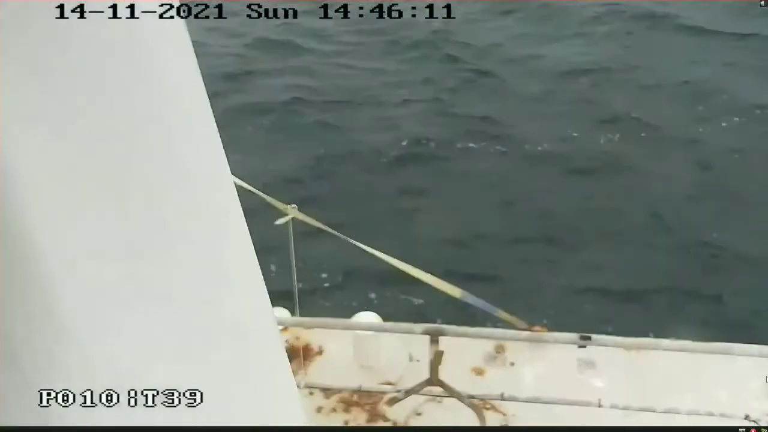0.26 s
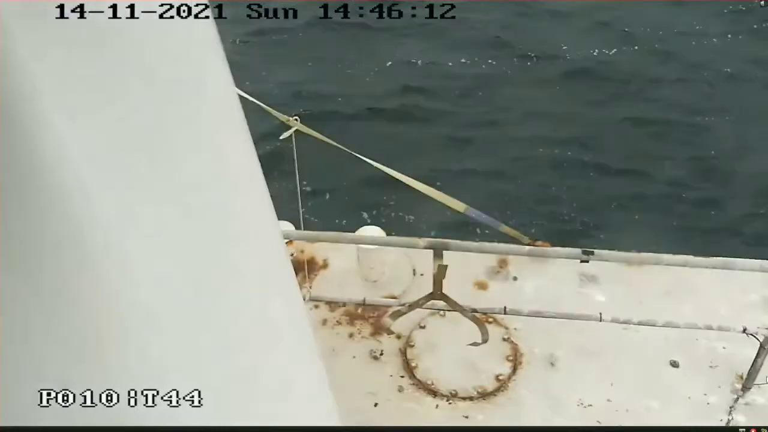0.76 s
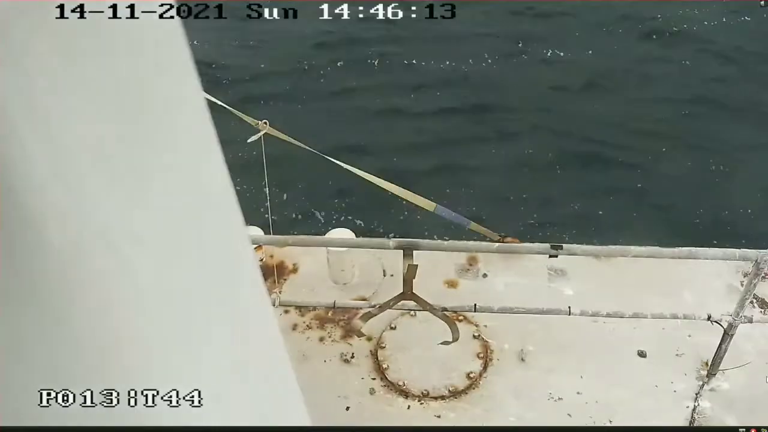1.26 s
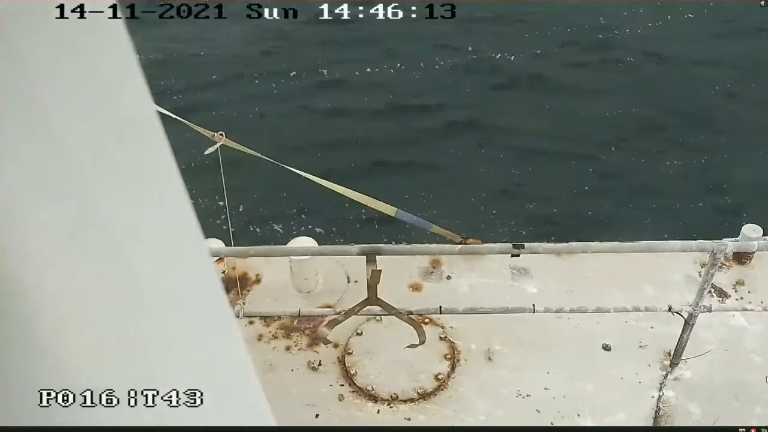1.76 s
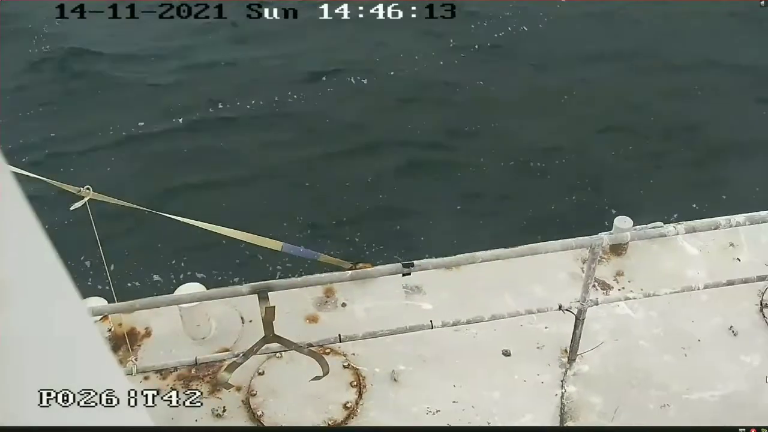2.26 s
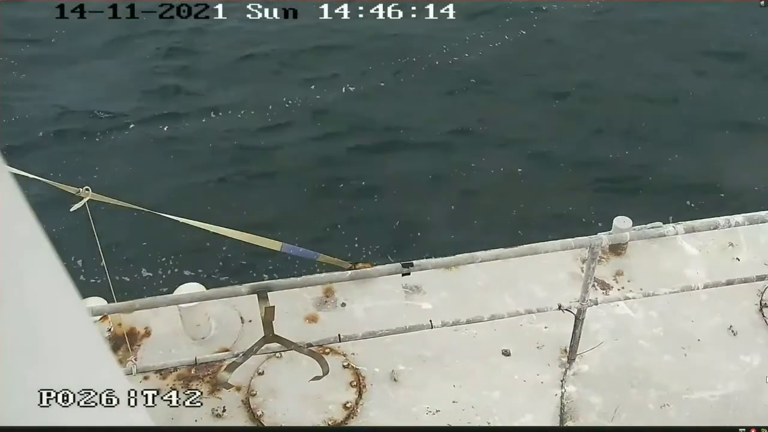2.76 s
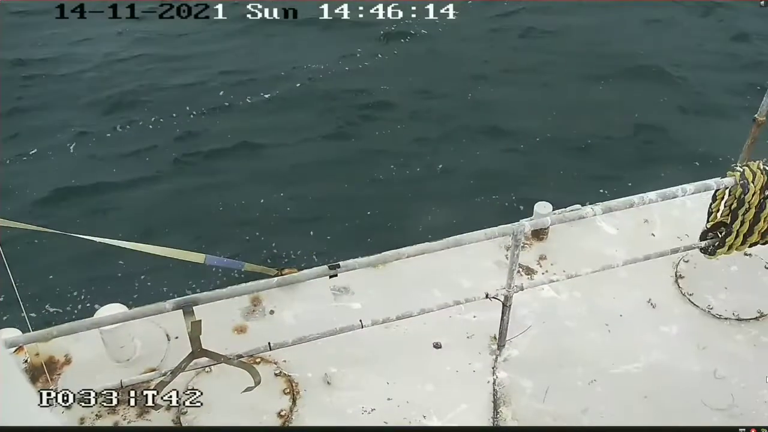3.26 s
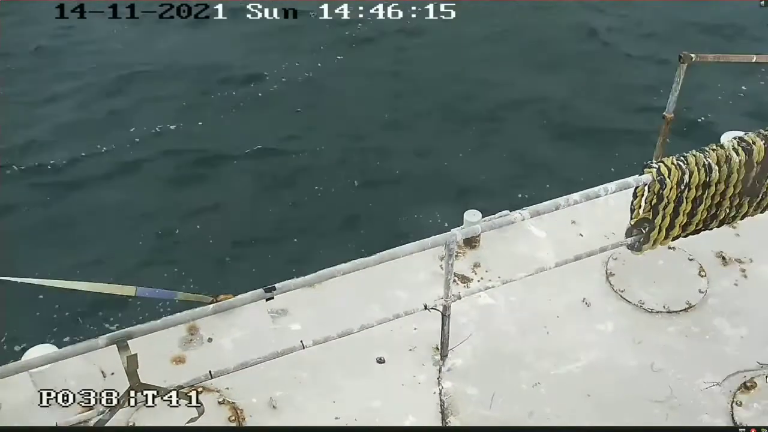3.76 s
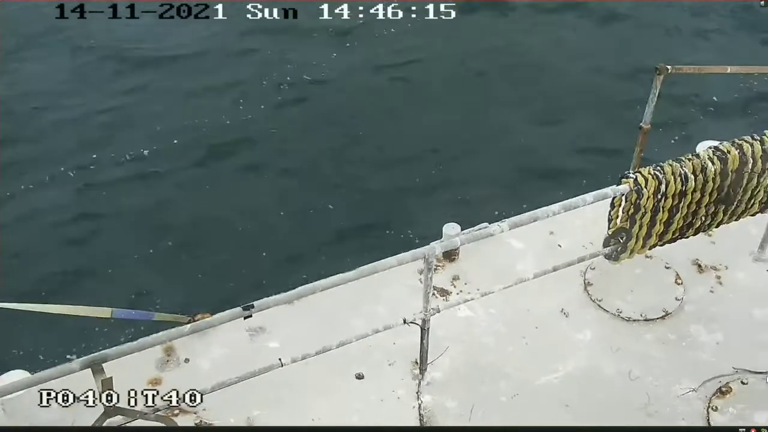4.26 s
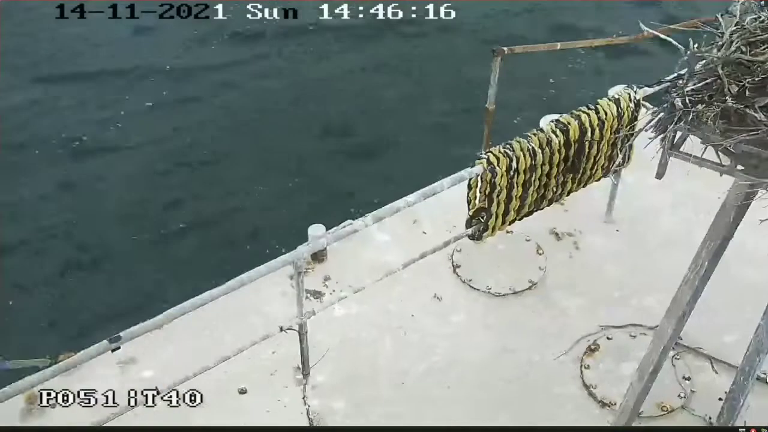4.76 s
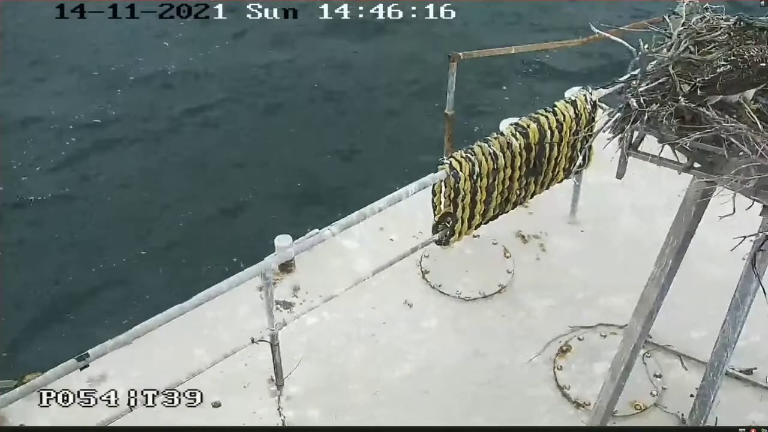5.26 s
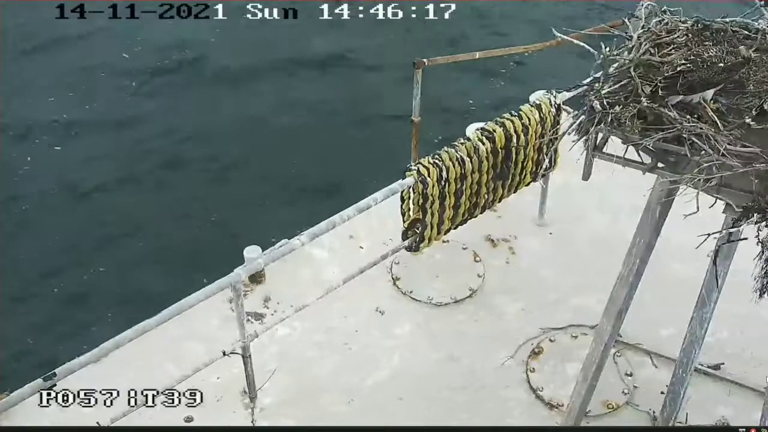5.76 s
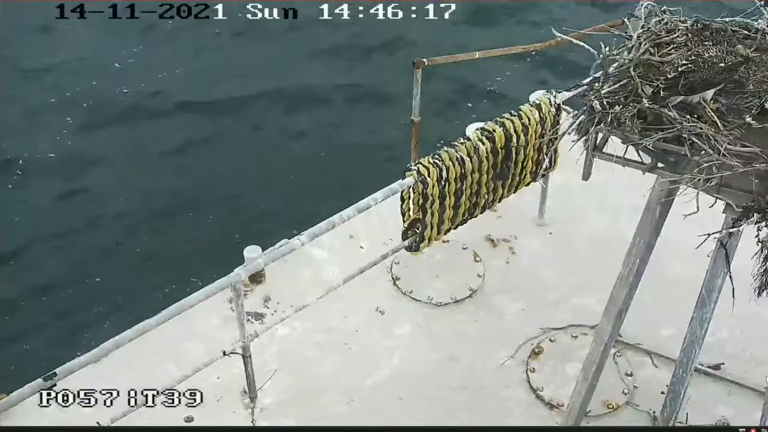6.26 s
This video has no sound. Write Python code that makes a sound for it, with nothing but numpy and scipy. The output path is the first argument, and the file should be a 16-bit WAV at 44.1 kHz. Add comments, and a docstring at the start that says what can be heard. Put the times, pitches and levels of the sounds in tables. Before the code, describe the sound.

An unseen bird of prey on a nest platform at sea utters seven shrill, raspy whistles, the first already under way. Each flicks up, wavers between hoarse rasp and clear tone, then flicks down. Wind thumps the outdoor camera microphone early, eases, then returns thickly near the end with small clicks. A faint water wash lies beneath; the lo-fi sound has metallic treble and tiny dropouts.

```python
"""An osprey on its nest on a platform at sea whistles seven calls over wind and a faint wash, near a
surveillance camera. The first call is under way at the start; the others run from yip to yip, chaotic rasp
giving way to clear sine notes, with a thin whistle above. Noise-and-pulse wind buffets the microphone from
0.5 s, hardest near 1.9 s, and thickly again from 5.1 s, when clicks join it. Throughout, the camera's 8 kHz
sampling mirrors the calls into the treble; its sound cuts out for instants early and late."""
import sys
import numpy as np
from scipy import signal
from scipy.fft import rfft, irfft
from scipy.io import wavfile
from scipy.ndimage import uniform_filter1d

SR = 44100
rng = np.random.default_rng(int(sys.argv[2]) if len(sys.argv) > 2 else 0)


def transcribe(signal):
    """Save signal, clipped to [-1, 1], as a 16-bit WAV file at the path in sys.argv[1]."""
    frames = np.atleast_2d(signal).T
    limited = np.clip(frames, -1, 1)
    pcm = np.round(limited * 32767).astype(np.int16)
    wavfile.write(sys.argv[1], SR, pcm)


N = 287091
TIME = np.arange(N) / SR


def amp(db):
    """Decibel law: the amplitude ratio of a level."""
    return 10 ** (np.asarray(db) / 20)


def unit(x):
    """Normalisation: scales a signal to rms 1."""
    return x / np.sqrt(np.mean(x ** 2) + 1e-20)


def add(mix, s, sound):
    """Superposition: adds a sound to the mix at time s, or at the start if s is negative."""
    part = mix[max(round(s * SR), 0):][:len(sound)]
    part += sound[:len(part)]


def level_at(times, rows):
    """Interpolation: reads a (time [s], level [dB]) table at the given times."""
    return np.interp(times, *np.transpose(rows))


def colour(x, points):
    """Spectral shaping: filters by (frequency [Hz], gain [dB]) points joined on a log-frequency axis."""
    hz, db = np.transpose(points)
    bins = np.fft.rfftfreq(len(x), 1 / SR)
    gain_db = np.interp(np.log(bins + 1), np.log(hz + 1), db)
    return irfft(rfft(x) * amp(gain_db), len(x))


def noise(points):
    """Coloured noise: white noise shaped to a spectrum, at rms 1."""
    return unit(colour(rng.standard_normal(N), points))


def wander(rate_hz, size):
    """Low-passed randomness: smooth motion up to about rate_hz, from a one-second loop of rms 1."""
    bins = np.fft.rfftfreq(SR, 1 / SR)
    spectrum = rfft(rng.standard_normal(SR)) / (1 + ((bins / rate_hz) ** 2) ** 2)
    return np.resize(unit(irfft(spectrum, SR)), size)


def low_lumps(rate_hz):
    """Band-limited fluctuation: random swings of rms 1 over the whole scene, mostly below rate_hz."""
    return noise([(rate_hz, 0), (2 * rate_hz, -60)])


def low_pass(x, edge_hz):
    """Band limiting: a steep linear-phase low-pass."""
    return signal.oaconvolve(x, signal.firwin(1023, edge_hz, window=("kaiser", 9), fs=SR), "same")


def follow(rows):
    """Interpolation: the start time and one curve per further column of a table."""
    s, *columns = np.transpose(rows)
    t = np.arange(s[0], s[-1], 1 / SR)
    return s[0], [np.interp(t, s, c) for c in columns]


def faded(x, fade_s=.003):
    """Click avoidance: linear ramps at both ends."""
    i = np.arange(len(x))
    return x * np.minimum(np.minimum(i, i[::-1]) / (fade_s * SR), 1)


def quadrature_noise(rate_hz, phase):
    """Random modulation: two wandering carriers in quadrature widen a line into a band."""
    n = len(phase)
    return wander(rate_hz, n) * np.cos(phase) + wander(rate_hz, n) * np.sin(phase)


def whistle(hz, db, rough, rasp_hz=130, skirt_hz=430, skirt_db=-5.5, skirt_ratio=.94,
            jitter=.011, throb_hz=45, throb_db=1.8):
    """Nonlinear voicing: a near sine whose swing turns chaotic as roughness (0 to 1) rises."""
    n, rough = len(hz), np.clip(rough, 0, 1)
    phase = 2 * np.pi * np.cumsum(hz * (1 + jitter * rough * wander(150, n))) / SR
    core = quadrature_noise(rasp_hz, phase)
    skirt = quadrature_noise(skirt_hz, skirt_ratio * phase)
    # the rasp comes in uneven spurts
    rasp = unit((core + amp(skirt_db) * skirt) * amp(throb_db * wander(throb_hz, n)))
    clear = np.sqrt(2 * (1 - rough ** 2)) * np.sin(phase)
    return faded(amp(db) * (clear + rough * rasp))


def side_tone(hz, db, jitter, shimmer):
    """Frequency and amplitude modulation: a thin sine that trembles in pitch and strength."""
    n = len(hz)
    phase = 2 * np.pi * np.cumsum(hz * (1 + jitter * wander(230, n))) / SR
    return faded(amp(db) * np.sqrt(2) * np.sin(phase) * (1 + shimmer * wander(110, n)))


# the hoarse body of each call: (start [s], end [s], starting pitch [Hz], climb over the call [Hz],
# starting level before yielding to clear notes [dB], swell to the end [dB], arch in the middle [dB],
# roughness [0-1, excess is limited])
CALL_BODIES = [(0, 0.376, 3170, -59, -54.5, -13, -3.5, 1.1), (0.779, 1.369, 3210, -1.5, -53, 4, -3, 0.92),
               (1.725, 2.145, 3364, -100, -62, -4.5, 5, 1.13), (2.693, 3.339, 3113, 129, -63, -6, 3.5, 1.2),
               (3.598, 4.006, 2643, 110.5, -61.5, -0.5, 7, 0.71),
               (4.444, 4.955, 2676, 283, -52, -7, -1, 0.74), (5.516, 6.092, 2783, 132, -51.5, -6, 0, 0.76)]


def rasps():
    """Chaotic oscillation: each hoarse body drifts steadily in pitch while its level slopes and arches."""
    out = np.zeros(N)
    for start, end, hz, climb_hz, db, swell_db, arch_db, rough in CALL_BODIES:
        u = np.linspace(0, 1, round((end - start) * SR))
        level_db = db + swell_db * u + arch_db * np.sin(np.pi * u)
        add(out, start, whistle(hz + climb_hz * u, level_db, rough))
    return out


# stretches where the voice runs clear, one curve a note: (time [s], pitch [Hz], level [dB])
CLEAR_NOTES = [
    [(0.0, 3093, -48), (0.018, 3200, -36.5), (0.036, 3296, -47.5), (0.045, 3330, -51)],
    [(0.83, 3330, -54), (0.84, 3250, -36), (0.852, 3192, -33), (0.9, 3356, -42), (0.915, 3374, -51)],
    [(3.078, 3190, -52), (3.092, 3118, -46), (3.148, 3124, -65), (3.162, 3140, -44), (3.19, 3087, -55),
     (3.21, 3305, -42.5), (3.225, 3310, -60)],
    [(1.762, 3220, -47), (1.774, 3156, -41), (1.842, 3200, -33.5), (1.868, 3277, -39), (1.878, 3407, -46),
     (1.9, 3445, -39.5), (1.918, 3500, -46.5), (1.925, 3455, -50)],
    [(2.715, 3160, -47), (2.723, 2936, -48.5), (2.741, 2887, -55), (2.793, 2949, -47), (2.843, 2946, -48.5),
     (2.891, 3023, -42.5), (2.957, 3032, -39), (2.989, 3055, -46.5), (2.997, 3013, -55),
     (3.013, 3090, -45.5), (3.033, 3218, -54.5), (3.048, 3246, -44.5)],
    [(3.545, 2660, -45), (3.553, 2586, -51.5), (3.605, 2644, -48.5), (3.62, 2770, -48)],
    [(5.535, 2730, -52), (5.555, 2770, -42.5), (5.575, 2810, -46), (5.587, 2760, -52)],
    [(5.61, 2790, -68), (5.64, 2940, -42.5), (5.662, 2980, -51)],
]


def clear_notes():
    """Periodic oscillation: the voice locks into an almost pure, gliding tone."""
    out = np.zeros(N)
    for rows in CLEAR_NOTES:
        start, (hz, db) = follow(rows)
        add(out, start, whistle(hz, db, rough=.1))
    return out


# the thin upper whistle, one curve an entry:
# (time [s], pitch [Hz], level before yielding to clear notes [dB])
UPPER_WHISTLE = [
    [(.065, 4170, -66), (.15, 4300, -78), (.36, 4420, -92)],
    [(.77, 4160, -56.5), (.82, 4120, -64), (.9, 4200, -64), (.94, 4220, -55), (1.0, 4206, -59),
     (1.07, 4253, -66.5), (1.325, 4360, -64), (1.36, 4180, -63)],
    [(1.716, 4310, -68), (1.752, 4040, -58)],
    [(1.925, 4250, -78), (2.03, 4380, -67.5), (2.15, 4400, -77)],
    [(2.685, 4160, -71.5), (2.735, 4340, -42.5)],
    [(3.22, 4280, -66), (3.345, 4330, -91)],
    [(3.505, 3345, -62), (3.53, 3270, -59.5), (3.59, 3330, -81), (3.62, 3357, -53.5), (3.67, 3376, -52),
     (3.695, 3450, -71), (3.725, 3516, -54), (3.78, 3610, -64.5), (3.86, 3754, -58), (3.97, 3880, -68),
     (4.005, 3730, -62.5)],
    [(4.445, 3610, -54.5), (4.505, 3573, -60), (4.59, 3780, -61), (4.71, 3980, -70.5), (4.76, 4095, -70),
     (4.795, 4180, -86), (4.825, 4130, -68), (4.915, 4195, -68), (4.94, 4120, -62)],
    [(5.505, 3700, -77), (5.55, 3830, -55)],
    [(5.69, 3960, -74), (5.82, 4070, -69.5), (5.92, 4075, -71), (6, 4124, -60.5), (6.06, 4150, -64.5),
     (6.09, 4070, -56)],
]


def upper_whistles():
    """Biphonation: a thin second voice eases in above the rasp."""
    out = np.zeros(N)
    for rows in UPPER_WHISTLE:
        start, (hz, db) = follow(rows)
        add(out, start, faded(side_tone(hz, db, jitter=.0032, shimmer=.25), fade_s=.015))
    return out


def swoop(s, hz, db, glide_hz_per_s, hold_s, fall_db_per_s):
    """Linear chirp: start time, pitch and level of a quick glide that swells and dies around its peak."""
    t = np.arange(-SR // 30, SR // 30) / SR
    return s + t[0], hz + glide_hz_per_s * t, db - fall_db_per_s * (np.hypot(t, hold_s) - hold_s)


# flicks at the ends of the calls:
# (peak time [s], pitch [Hz], level [dB], glide [Hz/s], hold [s])
YIPS = [(0.387, 2974, -46.5, -14000, 0.0014), (.77, 3023, -42, 7010, 0.0016),
        (1.356, 3035, -41.5, -15000, 0.0022), (1.735, 3140, -52, 3006.5, 0.0011),
        (2.176, 3177, -38, -13000, 0.0017), (2.681, 2970, -51, 10003.5, 0.014),
        (3.369, 3004, -46, -13000, 0.002), (3.498, 2370, -57.5, 8006, 0.0014),
        (3.997, 2590, -45.5, -10000, 0.0018), (4.443, 2675, -47, 6997, .004),
        (4.958, 2720, -45.5, -8000, 0.0018), (5.501, 2743, -42, 7006, 0.0075),
        (6.107, 2736, -43, -7000, 0.0046)]


def yips(fall_db_per_s=1400):
    """Chirped onset and release: calls open with an upward flick and close with a downward one."""
    out = np.zeros(N)
    for row in YIPS:
        start, hz, db = swoop(*row, fall_db_per_s)
        add(out, start, whistle(hz, db, rough=.38))
    return out


# brief low notes where the voice cracks:
# (peak time [s], pitch [Hz], level [dB], glide [Hz/s], hold [s])
CRACKS = [(.393, 2290, -61, -16000, 0.0048), (0.759, 2310, -47, 14005, 0.0038),
          (1.365, 2260, -53, -16000, 0.0025), (2.183, 2260, -60, -16000, .004),
          (2.86, 2384, -60, 1485, 0.062), (3.383, 2270, -57, -13000, 0.0028)]


def cracks(fall_db_per_s=2100):
    """Register break: the voice cracks briefly into a lower gliding note."""
    out = np.zeros(N)
    for row in CRACKS:
        start, hz, db = swoop(*row, fall_db_per_s)
        add(out, start, side_tone(hz, db, jitter=.012, shimmer=.3))
    return out


def osprey(rasp_yield_db=-6, upper_yield_db=-18):
    """Mode competition: rasp and upper whistle give way whenever the voice runs clear."""
    spans = sum((TIME > rows[0][0]) & (TIME < rows[-1][0]) for rows in CLEAR_NOTES)
    clear = uniform_filter1d(1. * spans, size=400)
    voice = clear_notes() + yips() + cracks()
    hoarse = rasps() * amp(rasp_yield_db * clear)
    upper = upper_whistles() * amp(upper_yield_db * clear)
    return voice + hoarse + upper


def deck(x, echo_db=-22, t60_s=.17):
    """Diffuse reverberation: faint, exponentially dying scatter from the deck and rails."""
    t = np.arange(SR // 2) / SR
    tail = rng.standard_normal(len(t)) * amp(-60 * t / t60_s) * (t > .004)
    return x + amp(echo_db) * signal.oaconvolve(x, tail / np.linalg.norm(tail))[:N]


def two_sided_decay(t, rise_s, fall_s):
    """Exponential envelope: grows up to t = 0 and decays after it."""
    return np.exp(-abs(t) / np.where(t < 0, rise_s, fall_s))


# the wind between buffets: (time [s], level before the wind or eddy offset [dB])
WIND = [(0, -74.5), (.72, -69.5), (.84, -53.5), (1.25, -74.5), (1.41, -72), (1.52, -60.5), (1.68, -68.5),
        (1.91, -53), (2.15, -71), (3.0, -79), (3.9, -77), (4.3, -86), (4.5, -68), (5.07, -70.5),
        (5.22, -55), (5.9, -56), (6.27, -64), (6.45, -55.5)]
# spectrum of the wind: (frequency [Hz], relative density [dB])
WIND_COLOUR = [(20, -36), (60, -17.5), (130, -3), (260, -2.5), (400, -7), (600, -10.5), (900, -19.5),
               (1500, -23.5), (3500, -45.5)]


def wind(lumps_db=5, wind_db=-2.5, wake_db=-21):
    """Turbulent noise: a lumpy low rumble swells with each gust and lingers in each buffet's wake."""
    power = amp(level_at(TIME, WIND) + wind_db) ** 2
    t = np.arange(-SR // 10, SR // 3) / SR
    for s, db, _, _ in BUFFETS:
        wake = amp(db + wake_db) * two_sided_decay(t, rise_s=.005, fall_s=.018)
        add(power, s + t[0], wake ** 2)
    lumps = unit(amp(lumps_db * low_lumps(60)))
    return np.sqrt(power) * lumps * noise(WIND_COLOUR)


# the wash of the sea: (time [s], level before sea_db [dB])
SEA = [(0.0, -81.5), (0.52, -87), (0.8, -82.5), (2.06, -86), (2.48, -87.5), (2.86, -81), (3.37, -86.5),
       (3.77, -84.5), (4.15, -88), (4.42, -89.5), (4.55, -85), (5.44, -85), (6.25, -84), (6.51, -86)]
# spectrum of the wash: (frequency [Hz], relative density [dB])
SEA_COLOUR = [(20, -5.5), (200, 1.5), (700, -3), (1500, -1.5), (2500, -2), (3400, -6.5), (4000, -14.5),
              (4700, -34)]


def sea(sea_db=7, flicker_db=2.3):
    """Modulated broadband noise: a faint wash of water with a quick random flicker in level."""
    level_db = level_at(TIME, SEA) + sea_db + flicker_db * low_lumps(81)
    return amp(level_db) * noise(SEA_COLOUR)


# what the camera's weak smoothing filter lets through: (frequency [Hz], gain [dB])
SMOOTHING = [(20, 7), (3200, 2), (4000, 6), (4400, 0), (4800, -6), (5250, -10), (5700, -14), (6400, -21.5),
             (7500, -48), (8700, -46.5), (10300, -23), (11200, -20), (12200, -13.5), (13000, -25.5),
             (13700, -33), (15300, -40.5)]


def coarse_sampling(x, rate_hz=8000):
    """Spectral imaging: sampling copies the band around each multiple of the rate; smoothing is weak."""
    comb = 1 + 2 * np.cos(2 * np.pi * rate_hz * TIME) + 2 * np.cos(2 * np.pi * 2 * rate_hz * TIME)
    return colour(x * comb, SMOOTHING)


def rounding_hiss(level, hiss_db=-85, full_db=-66):
    """Quantisation noise: a faint hiss that fades away with the sound below full_db."""
    return amp(hiss_db) * np.minimum(level / amp(full_db), 1) * rng.standard_normal(N)


# instants when the sound cuts out: start time [s]
DROPOUTS = [.050, .189, .289, .429, .569, .709, 5.169, 5.309, 5.409, 5.588, 5.769, 5.869, 6.009, 6.149,
            6.289]


def gate_and_dropouts(level, gate_db=-77.5, shut_db=-20, dropout_db=-26, dropout_s=.0185):
    """Threshold switching: the gate stutters as the sound sinks to its threshold; dropouts cut deeper."""
    gain = np.where(level > amp(gate_db), 1, amp(shut_db))
    for s in DROPOUTS:
        gain[(TIME > s) & (TIME < s + dropout_s)] = amp(dropout_db)
    return uniform_filter1d(gain, size=16)


def push(t, hz, turn, cycles=.58):
    """Gaussian wave packet: a pressure swing of one or two cycles around t = 0."""
    return np.exp(-.5 * (t * hz / cycles) ** 2) * np.cos(2 * np.pi * (hz * t + turn))


def eddies(eddy_db=11, strongest_db=-46, spread_db=2, eddy_hz=330, spread_octaves=.3, count=100):
    """Random turbulence: small pushes land at random, growing with the wind up to a ceiling plus spread."""
    out, t = np.zeros(N), np.arange(-SR // 50, SR // 50) / SR
    for (when, turn), (size, pitch) in zip(rng.random((count, 2)), rng.standard_normal((count, 2))):
        s = when * N / SR
        db = min(level_at(s, WIND) + eddy_db, strongest_db) + spread_db * size
        add(out, s, amp(db) * push(t, eddy_hz * 2 ** (spread_octaves * pitch), turn))
    return out


# wind buffets: (time [s], level before the push, churn or wake offset [dB], pitch [Hz], crackle level [dB])
BUFFETS = [(0.469, -44.5, 200, -72), (.62, -42, 706, -53), (0.659, -33, 398, -65.5),
           (0.677, -43.5, 377, -66), (0.766, -44.5, 308, -67), (0.806, -37.5, 330, -52),
           (.816, -47, 550, -43), (.826, -36, 332, -49.5), (.986, -43.5, 540, -41),
           (1.107, -53.5, 718, -43), (1.121, -38, 540, -44.5), (1.132, -36.5, 435, -44),
           (1.445, -45.5, 430, -58.5), (1.461, -39.5, 354, -52.5), (1.489, -32, 430, -70),
           (1.512, -43, 380, -86), (1.575, -34, 480, -60), (1.59, -36, 345, -49.5), (1.74, -34.5, 300, -38),
           (1.756, -37.5, 390, -50), (1.857, -23.5, 534, -39), (1.866, -23.5, 706, -38.5),
           (1.882, -29, 300, -47.5), (1.899, -31.5, 365, -46.5), (1.958, -43.5, 267, -71),
           (1.996, -47.5, 238, -77), (2.017, -47, 269, -82.5), (2.075, -47.5, 213, -76),
           (2.583, -48.5, 500, -72), (2.759, -38.5, 335, -73.5), (3.356, -47, 253, -88),
           (3.532, -35, 292, -41), (3.551, -27.5, 756, -45.5), (4.401, -42.5, 342, -49),
           (4.487, -45, 248, -85), (4.7, -47.5, 266, -56), (4.873, -45, 434, -59), (4.923, -40, 467, -48.5),
           (5.105, -35.5, 405, -56), (5.153, -35, 487, -83), (5.163, -35, 306, -46), (5.186, -32, 292, -56),
           (5.257, -33.5, 320, -46), (5.268, -33, 550, -72), (5.306, -33, 345, -52), (5.33, -41, 477, -68),
           (5.375, -40, 315, -62), (5.518, -38.5, 430, -51), (5.622, -33, 390, -55),
           (5.654, -33.5, 370, -50), (5.718, -31.5, 510, -59), (5.754, -41, 308, -57.5),
           (5.917, -38, 270, -65), (5.936, -37, 358, -48), (6.108, -41, 500, -72), (6.195, -36.5, 372, -66),
           (6.255, -49.5, 296, -69), (6.334, -33.5, 437, -45), (6.419, -37, 416, -76),
           (6.453, -39, 294, -83), (6.494, -34.5, 410, -68)]
# spectrum of the crackle: (frequency [Hz], relative gain [dB])
CRACKLE_COLOUR = [(50, 0.5), (600, 12.5), (1300, 4), (2200, 7), (3000, -1), (4000, -25)]


def buffets(push_db=-2, thud_db=-6, thud_hz=185, thud_full_db=-24, churn_db=-18, rise_s=.0022):
    """Eddy impact: each eddy gives the microphone one short push, with churning air and a little crackle."""
    pushes, churn, crackle = np.zeros((3, N))
    t = np.arange(-SR // 20, SR // 20) / SR
    for (s, db, hz, crackle_db), turn in zip(BUFFETS, rng.random(len(BUFFETS))):
        # the strongest eddies are large and carry a deeper thud
        weight = min(amp(db - thud_full_db), 1) * amp(thud_db)
        swing = push(t, hz, turn) + weight * push(t, thud_hz, turn)
        add(pushes, s + t[0], amp(db + push_db) * swing)
        add(churn, s + t[0], amp(db + churn_db) * two_sided_decay(t, rise_s, fall_s=.005))
        add(crackle, s + t[0], amp(crackle_db) * two_sided_decay(t, rise_s, fall_s=.0038))
    # sparse impulses, about 2500 a second
    impulses = rng.standard_normal(N) * (rng.random(N) < 2500 / SR)
    grains = unit(colour(impulses, CRACKLE_COLOUR))
    return pushes + churn * noise(WIND_COLOUR) + crackle * grains


# sharp ticks in the camera's sound: (time [s], level before tick_db [dB])
TICKS = [(5.188, -54), (5.2679, -38), (5.3683, -56.5), (5.5478, -44), (5.647, -46), (5.688, -54),
         (5.73, -47.5), (5.9276, -52), (6.0295, -51), (6.108, -46.5)]


def ticks(tick_db=8, tick_s=.00006):
    """Impulsive excitation: very short broadband clicks where pieces of the camera's sound join."""
    out, t = np.zeros(N), np.arange(64) / SR
    for s, db in TICKS:
        add(out, s, amp(db + tick_db) * np.exp(-t / tick_s))
    return out


def scene():
    """Superposition: the bird with its scatter, over wind and water."""
    return (deck(osprey()) + buffets() + eddies() + wind() + sea())[None]


def record(dry, input_edge_hz=4700, output_edge_hz=15600):
    """Signal chain: band limiting, coarse sampling and hiss, gate and dropouts, then ticks."""
    x = low_pass(dry[0], input_edge_hz)
    level = np.sqrt(abs(uniform_filter1d(x ** 2, size=70)))
    sampled = coarse_sampling(x) + rounding_hiss(level)
    return low_pass(sampled * gate_and_dropouts(level) + ticks(), output_edge_hz)[None]


dry = scene()
out = record(dry)
transcribe(out)
```